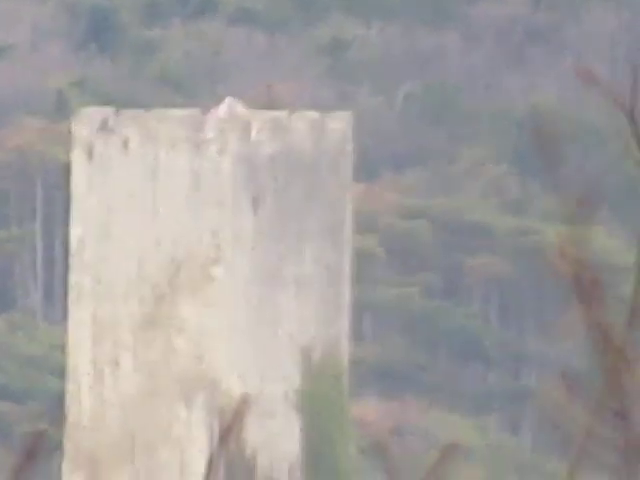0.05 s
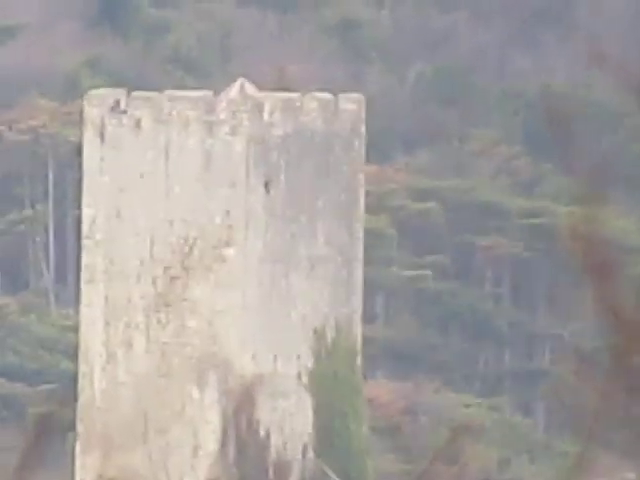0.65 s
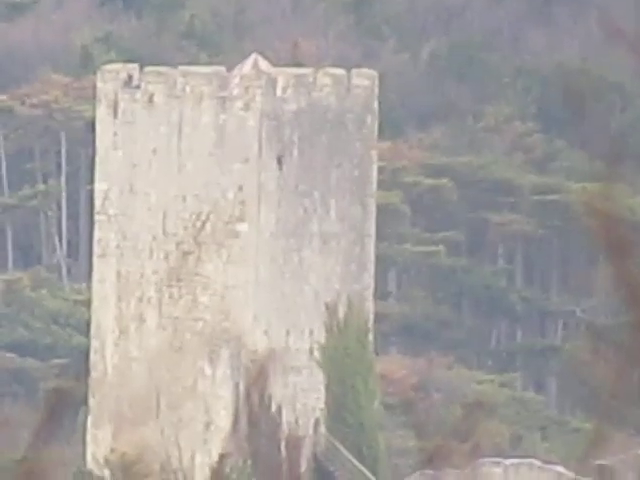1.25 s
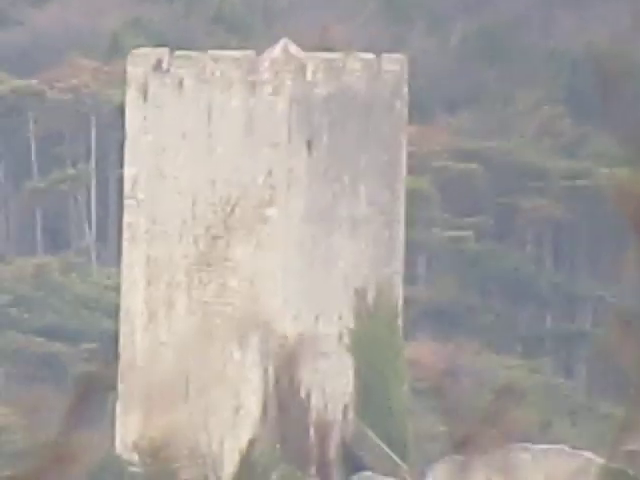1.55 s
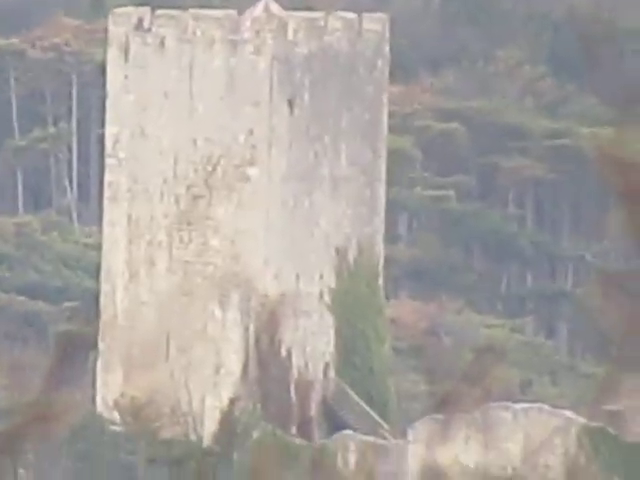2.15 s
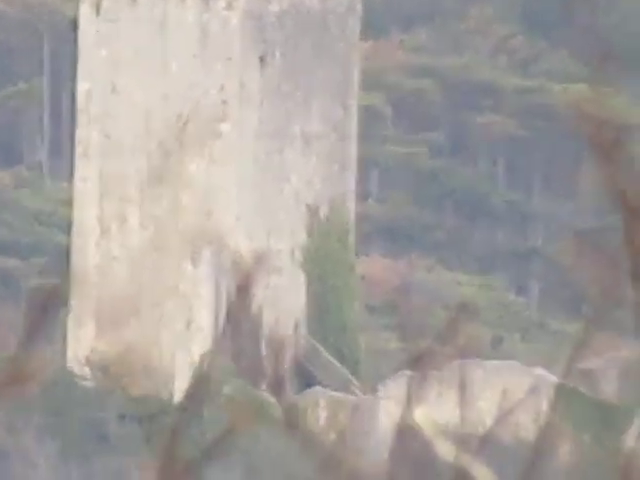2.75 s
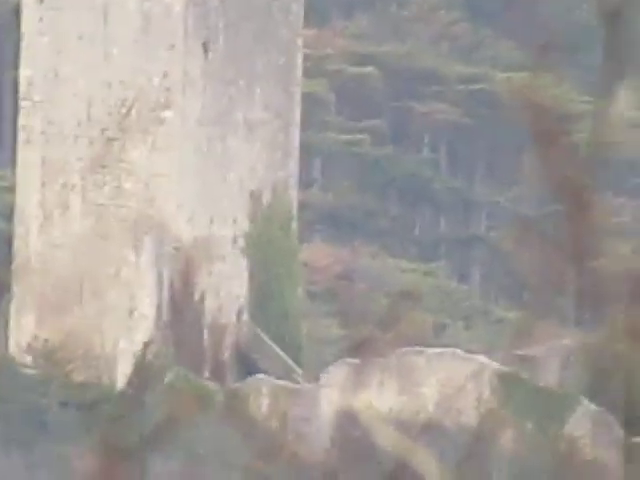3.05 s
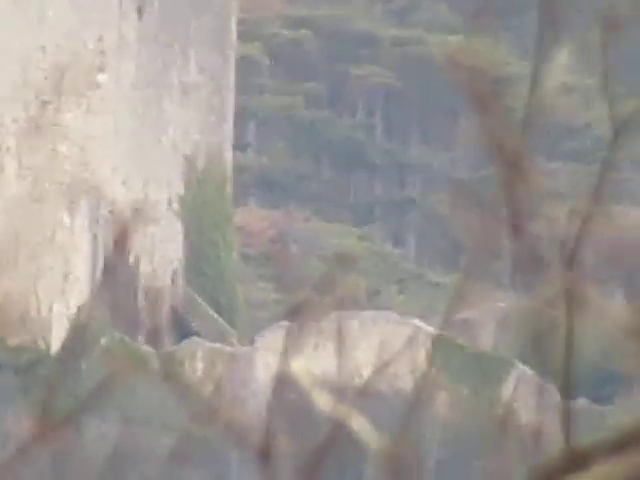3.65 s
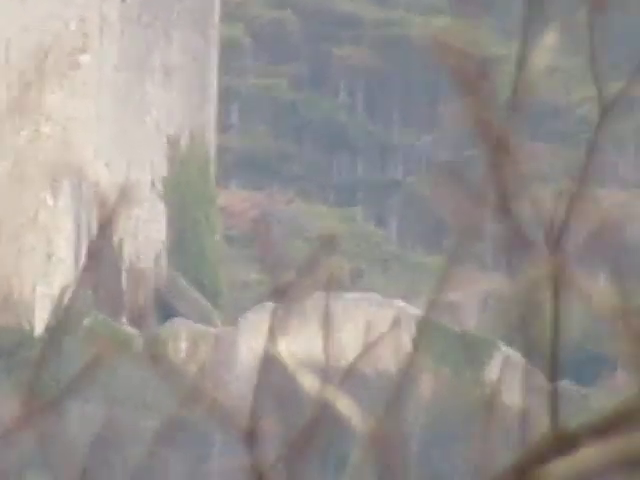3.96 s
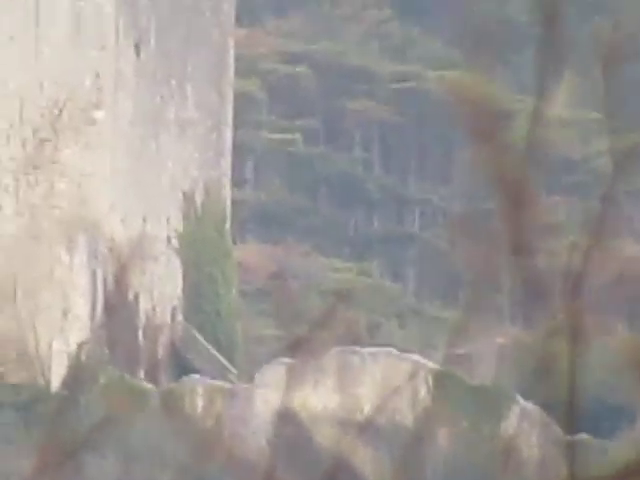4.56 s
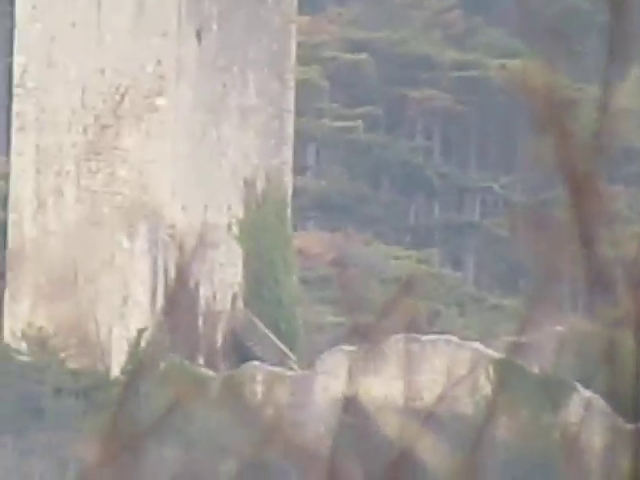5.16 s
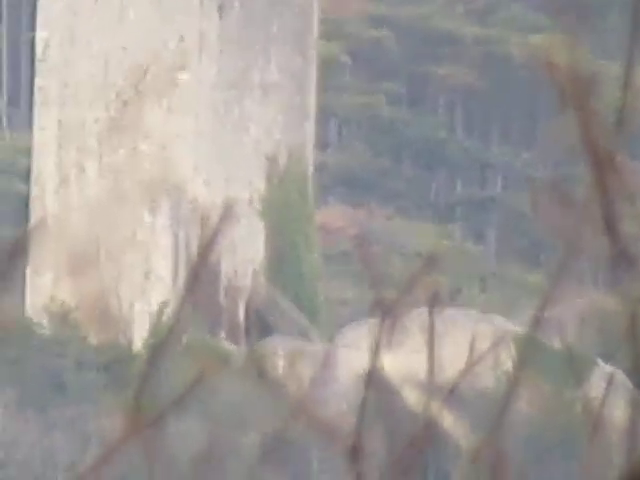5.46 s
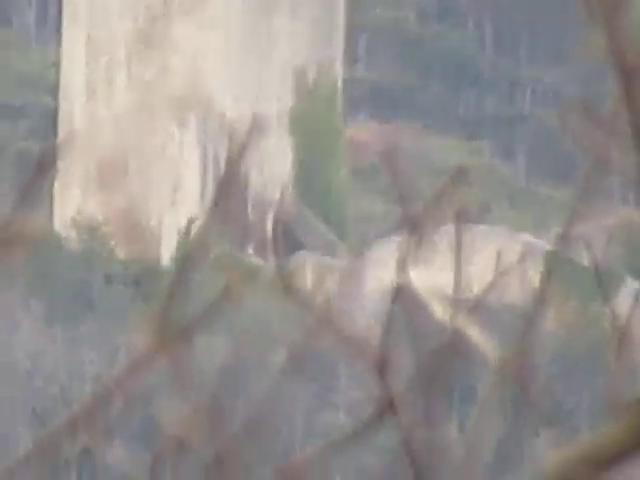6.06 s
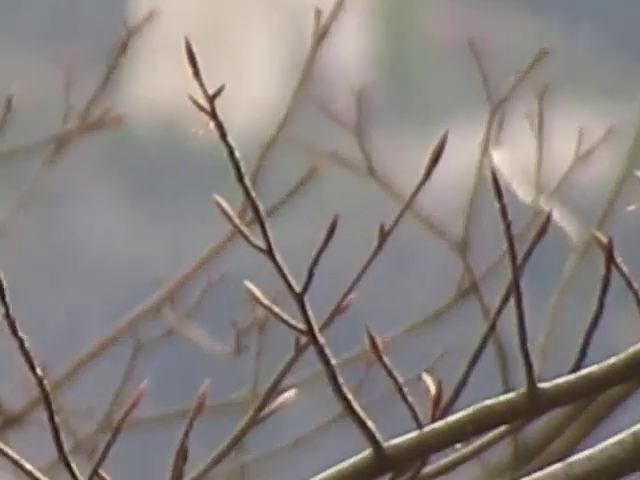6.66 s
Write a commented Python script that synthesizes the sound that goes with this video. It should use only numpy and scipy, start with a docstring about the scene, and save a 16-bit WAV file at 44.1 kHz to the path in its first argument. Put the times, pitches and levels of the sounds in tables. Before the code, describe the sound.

Distant traffic makes a low, steady rumble under a faint hiss of open air. Small birds scatter short, high chirps and a few nasal calls that echo lightly among trees. Two sharp clicks from a handled camera sound very close, about three seconds apart, the second led by small plastic ticks and finger rubs as the traffic swells. A bright tweet and a drawn-out nasal note come near the end.

```python
"""A hillside of bare trees above a valley. Small birds whistle quick rising chips and give a few
nasal, drawn-out notes, rich in harmonics; the wood scatters them into a soft echo. Close to the
microphone a handled camera creaks by stick-slip friction and lets go in two sharp clicks.
Distant traffic rumbles in the valley, with one main swell, over a low murmur and a faint hiss."""
import sys
import numpy as np
from scipy import signal
from scipy.fft import rfft, irfft, next_fast_len
from scipy.io import wavfile
from scipy.ndimage import uniform_filter1d

SR = 44100
rng = np.random.default_rng(int(sys.argv[2]) if len(sys.argv) > 2 else 0)


def master(y):
    """Save y as 16-bit WAV."""
    cut = np.clip(np.atleast_2d(y).T, -1, 1)
    pcm = np.round(cut * 32767)  # scale
    wavfile.write(sys.argv[1], SR, pcm.astype(np.int16))


N = 305172


def whistled_calls(arch_power=2.1, tweet_s=.024, tweet_hz_per_s=25000, flick_s=.015, flick_ratio=.63):
    """Frequency sweeps: chips climb and level off, slurs glide straight, tweets flick up and rise on."""
    # (start [s], length [s], first pitch [Hz], top pitch [Hz], peak level [dB])
    chips = [ (.407, .020, 4100, 4280, -59), (.566, .022, 5500, 5680, -57), (.584, .021, 2400, 3850, -47),
             (.670, .024, 3050, 4500, -43.5), (1.065, .028, 2650, 3340, -47.5),
             (1.752, .028, 2500, 3130, -58), (1.81, .026, 2750, 3060, -57), (1.837, .022, 2750, 4230, -45),
             (1.967, .03, 2350, 3880, -51.5), (2.072, .021, 3100, 4150, -52),
             (2.839, .026, 2600, 2940, -50), (3.533, .019, 2690, 3350, -55.5),
             (3.610, .060, 2780, 3000, -61), (4.737, .028, 2450, 4520, -44.5),
             (5.409, .026, 2400, 3520, -41)]
    # two slurs at once are one bird's two voices
    # (start [s], length [s], first pitch [Hz], last pitch [Hz], peak level [dB])
    slurs = [ (.486, .029, 5100, 6330, -51), (.491, .027, 6420, 6200, -50), (.596, .023, 3430, 3680, -52),
             (1.514, .015, 4330, 2100, -43.5), (1.518, .018, 4800, 2800, -49),
             (1.543, .019, 2150, 3100, -48), (2.930, .013, 3380, 3290, -53), (2.930, .020, 6820, 6380, -60),
             (4.867, .030, 2550, 4000, -41.5), (4.994, .023, 3300, 4530, -39),
             (4.994, .022, 3900, 5120, -40.5), (5.519, .016, 6330, 5830, -50),
             (5.786, .036, 5950, 6260, -58), (6.03, .032, 8080, 7420, -57), (6.059, .024, 6700, 7380, -52),
             (6.074, .031, 3420, 4520, -36), (6.091, .036, 2480, 3220, -42)]
    # the bright whistle after each flick: (start [s], first pitch [Hz], peak level [dB])
    tweets = [(1.1995, 4620, -32.8), (2.988, 5380, -55), (5.525, 4650, -31.5)]
    out = np.zeros(N)
    for start, length, first_hz, top_hz, db in chips:
        arch_hz = top_hz - (top_hz - first_hz) * (1 - progress(length)) ** arch_power
        add(out, start, whistle(arch_hz, db, crest=.45))
    for start, length, first_hz, last_hz, db in slurs:
        add(out, start, whistle(first_hz + (last_hz - first_hz) * progress(length), db))
    for start, hz, db in tweets:
        flick_hz = hz * (flick_ratio + (1 - flick_ratio) * progress(flick_s))
        add(out, start - flick_s, whistle(flick_hz, db - 15.5))
        add(out, start, whistle(hz + tweet_hz_per_s * tweet_s * progress(tweet_s), db))
    return out


def whistle(hz, db, crest=.5, overtone_db=-35):
    """A near-pure tone swells and dies; random frequency modulation makes a steep fall harsh."""
    octaves_fallen = max(np.log2(hz[0] / hz[-1]), 0)
    waver = (.0068 + .04 * octaves_fallen) * narrow_noise(0, 300, len(hz))
    phase = phase_of(hz * (1 + waver))
    swell = np.sin(np.pi * np.interp(np.linspace(0, 1, len(hz)), [0, crest, 1], [0, .5, 1]))
    return from_db(db) * swell * (np.sin(phase) + from_db(overtone_db) * np.sin(2 * phase))


def nasal_notes(swell_db=13, dulling_db_per_octave=70, plateau=.7, release_s=.012):
    """Spectral tilt sets timbre: each short note grows louder and purer as its pitch rises."""
    # (start [s], length [s], first pitch [Hz], last pitch [Hz], full level [dB], first tilt [dB/octave])
    notes = [(1.355, .083, 1335, 1830, -42.5, 10), (1.474, .044, 1900, 2200, -41, -7),
             (5.812, .062, 1430, 1800, -45.5, 21)]
    out = np.zeros(N)
    for start, length, first_hz, last_hz, db, first_tilt_db in notes:
        u = progress(length)
        tilt_db = first_tilt_db - dulling_db_per_octave * u ** 2.2
        climb = u + plateau * np.sin(2 * np.pi * u) / (2 * np.pi)   # slowest in mid-note
        hz = first_hz + (last_hz - first_hz) * climb
        voice = nasal_voice(hz, db - swell_db * (1 - u) ** 2, tilt_db, rasp=.05)
        add(out, start, voice * np.minimum(1, (1 - u) * length / release_s))
    return out


def long_call(start_s=5.904, length_s=.18, held_hz=1652, db=-42.5, attack_s=.026, release_s=.016):
    """Pitch and tilt move together: a nasal call scoops down, holds brightly, rasps, falters and lifts."""
    out = np.zeros(N)
    t = length_s * progress(length_s)
    scoop = np.clip(1 - t / .04, 0, 1)
    lift = np.clip(1 - (length_s - t) / .024, 0, 1)
    falter = bell(start_s + t, centre_s=6.031, half_width_s=.012)
    rasp = .19 + .68 * bell(start_s + t, centre_s=5.976, half_width_s=.017)
    hz = held_hz + 150 * scoop + 38 * falter + 240 * lift
    tilt_db = 3 - 9 * scoop - 14 * lift
    envelope = np.minimum(1, np.minimum(t / attack_s, (length_s - t) / release_s))
    add(out, start_s, envelope * nasal_voice(hz, db - 6 * falter, tilt_db, rasp))
    return out


def nasal_voice(hz, db, tilt_db, rasp, trill_hz=300, pitch_depth=.049, level_depth=.58, flutter_db=2):
    """Source and filter: the throat favours harmonics 2 and 3; fast, uneven modulation adds the rasp."""
    # harmonics 1 to 4 before tilting: (relative level [dB])
    harmonics_db = [-17, -1, -3, -13.5]
    n = len(hz)
    trill = rasp * np.sin(phase_of(trill_hz * (1 + .3 * narrow_noise(0, 150, n))))
    waver = .0039 * narrow_noise(0, 250, n)
    phase = phase_of(hz * (1 + waver + pitch_depth * trill))
    voice = sum(from_db(harmonic_db + tilt_db * np.log2(max(k, 2) / 2)) * np.sin(k * phase)
                for k, harmonic_db in enumerate(harmonics_db, 1))
    voice /= np.sqrt(2 * uniform_filter1d(voice ** 2, size=200))   # level independent of tilt
    gain = from_db(db + flutter_db * narrow_noise(0, 160, n))
    return voice * (1 + level_depth * trill) * gain * signal.windows.tukey(n, .1)


def far_notes(width_hz=170):
    """Spectral broadening: distance smears thin, high whistles into narrow bands."""
    # (start [s], length [s], pitch [Hz], rms level at the crest [dB])
    notes = [(1.85, .09, 6100, -64), (2.14, .06, 7600, -67), (4.049, 0.16, 7500, -58),
             (4.39, .05, 7650, -64)]
    out = np.zeros(N)
    for start, length, hz, db in notes:
        n = int(length * SR)
        add(out, start, from_db(db) * np.sqrt(np.hanning(n)) * narrow_noise(hz, width_hz, n))
    return out


def wood_echo(x, t60_s=.41, first_echo_s=.0086, near_db=5, near_decay_s=.011):
    """Scattering: near branches return the sound at once, farther trunks leave a reverberant tail."""
    t = np.arange(SR // 2) / SR
    decay = from_db(-60 * t / t60_s) + from_db(near_db) * np.exp(-t / near_decay_s)
    echoes = rng.standard_normal(len(t)) * decay * (t > first_echo_s)
    return signal.fftconvolve(x, echoes / np.linalg.norm(echoes))[:N]


def camera():
    """Stick-slip: gripped plastic ticks and creaks, then lets go in a snap that rings the shell."""
    # (time [s], level [dB], tilt [dB/octave])
    ticks = [ (1.552, -45, -4), (1.5625, -29.5, -2), (1.5677, -17, 6), (3.8355, -43, -4),
             (4.1314, -31.5, -3.2), (4.2085, -38, -2), (4.2726, -34.5, -5.5), (4.328, -31.5, -2.5),
             (4.335, -30, -2.5), (4.345, -44.5, -2), (4.783, -33, -5), (4.7896, -30, -3), (4.7915, -35, -3),
             (4.7955, -34, -1)]
    # (time [s], level [dB], decay [s], tilt [dB/octave], tilt of creak and ring [dB/octave])
    snaps = [(1.5688, -5.6, .00025, 1.8, -3.6), (4.8009, -6.8, .00062, 4.8, -1.2)]
    # around each snap: (lead [s], level against the snap [dB], build-up [s], decay [s])
    creak = (.003, -25.2, .0026, .0018)
    ring = (0, -14.4, .0009, .0015)
    out = np.zeros(N)
    for at, db, tilt_db in ticks:
        add(out, *contact(at, db, tilt_db, build_s=.0003, decay_s=.001))
    for at, db, decay_s, tilt_db, body_tilt_db in snaps:
        add(out, *contact(at, db, tilt_db, build_s=.00018, decay_s=decay_s))
        add(out, at, knock())
        for lead_s, part_db, *build_and_decay in (creak, ring):
            add(out, *contact(at - lead_s, db + part_db, body_tilt_db, *build_and_decay))
    return out


def contact(at, db, tilt_db, build_s, decay_s):
    """Tiny slips excite the shell's resonances; gives (start, sound), with db roughly the level at the burst's
    peak."""
    # the shell's response: (frequency [Hz], relative level [dB])
    shell = [(300, -21), (900, -8.5), (1900, -2), (2400, -6.5), (3200, -1.5), (4000, -12), (5500, 2),
             (6600, -0.5), (8200, 4), (9600, 1), (10700, -6.5), (11600, 7), (12900, -5.5), (14600, 1)]
    t = np.arange(-SR // 50, SR // 50) / SR
    envelope = np.exp(-np.abs(t) / np.where(t < 0, build_s, decay_s))
    slip_spectrum = rfft(rng.choice([-1, 1], len(t)) * envelope)
    local_power = uniform_filter1d(np.abs(slip_spectrum) ** 2, size=50)
    crackle = irfft(slip_spectrum / np.sqrt(local_power), len(t))   # energy even over frequency
    return at + t[0], from_db(db) * coloured(crackle, shell, tilt_db) * np.sqrt(np.mean(envelope ** 2))


def knock(hz=490, db=-25, decay_s=.0013):
    """A heavily damped oscillator: the camera's body gives one short swing."""
    t = np.arange(SR // 50) / SR
    return from_db(db) * np.sin(2 * np.pi * hz * t) * np.exp(-t / decay_s)


def finger_rubs():
    """Sliding friction: skin on the camera's plastic gives brief, broadband noise."""
    # (start [s], length [s], rms level at the crest [dB])
    rubs = [(3.868, 0.1, -54.7), (4.001, .03, -58), (4.272, 0.083, -53.3), (4.788, .045, -51),
            (4.837, .02, -58)]
    # (frequency [Hz], relative spectral density [dB])
    friction = [(1000, -6), (2200, -2), (3500, -5), (5600, 2), (7500, -2), (9200, 0), (10600, -5),
                (11800, 1), (14800, -4)]
    out = np.zeros(N)
    for start, length, db in rubs:
        n = int(length * SR)
        add(out, start, from_db(db) * np.sqrt(np.hanning(n)) * coloured(rng.standard_normal(n), friction))
    return out


def traffic():
    """Incoherent sources add in power: far engines and tyres swell as vehicles come and go."""
    # dulled by distance: (frequency [Hz], relative spectral density [dB])
    rumble = [(45, -30), (64, -16.5), (88, -2), (115, -2), (155, -1), (180, -9), (205, -25), (300, -63)]
    drone = [(165, -37), (197, -7), (220, -1.5), (250, -0.5), (292, -2), (312, -16.5), (350, -25)]
    tyres = [(300, -18), (330, -5), (365, 1.5), (420, 3), (455, -5.5), (510, -0.5), (570, -12), (620, -7),
             (800, -21.5), (1500, -30)]
    # (frequency [Hz], half-width [Hz], level against the drone [dB])
    engine_tones = [(286.7, 6.4, -7)]
    # the steady flow: (rumble [dB], drone [dB], tyres [dB])
    steady_db = (-50.6, -54.8, -56.4)
    # (crest time [s], half-width [s], rumble [dB], drone [dB], tyres [dB])
    swells = [ (.02, .14, -62, -62, -52), (.6, .26, -45, -52.5, -64), (1.38, .18, -53, -51.5, -57),
              (3.3, .5, -44.5, -55.5, -59.5), (3.82, .22, -57, -41.5, -58), (4.15, .25, -48.5, -47, -48.8),
              (4.65, .25, -47.5, -52, -70), (5.52, .26, -45, -54.5, -80)]
    t = np.arange(N) / SR
    power = from_db(steady_db)[:, None] ** 2
    for at, half_width, *levels_db in swells:
        power = power + from_db(levels_db)[:, None] ** 2 * bell(t, at, half_width)
    rumble_gain, drone_gain, tyre_gain = np.sqrt(power)
    tones = sum(from_db(db) * narrow_noise(hz, width, next_fast_len(N))[:N]
                for hz, width, db in engine_tones)
    return rumble_gain * noise(rumble) + drone_gain * (noise(drone) + tones) + tyre_gain * noise(tyres)


def engine_hum(wander_hz=2.6):
    """Periodic firing gives one far engine a low note, which drifts in and out on the air."""
    # (crest time [s], half-width [s], frequency [Hz], peak level [dB])
    swells = [(2.56, .16, 112.2, -41.5), (3.45, .35, 116.8, -45), (5.68, .3, 113, -52)]
    t = np.arange(N) / SR
    wander = phase_of(wander_hz * narrow_noise(0, 8.2, next_fast_len(N))[:N])
    return sum(from_db(db) * bell(t, at, half_width) * np.sin(2 * np.pi * hz * t + wander)
               for at, half_width, hz, db in swells)


def valley_air(murmur_db=-52, hiss_db=-58):
    """Stationary noise: the valley's low murmur of wind and distance, with a faint hiss above it."""
    # (frequency [Hz], relative spectral density [dB])
    murmur = [(12, -16), (25, 9), (42, 10.5), (62, 8.5), (150, 0), (560, 0), (700, -2.5), (950, -4.5),
              (1200, -8.5), (1600, -17.5), (3000, -27)]
    hiss = [(650, -30), (1100, -7.5), (1280, -4), (1600, -2.5), (1860, -3.5), (2700, -4), (3430, -7),
            (7870, -8), (13700, -15), (15000, -20)]
    return from_db(murmur_db) * noise(murmur) + from_db(hiss_db) * noise(hiss)


def noise(spectrum):
    """Filtered white noise of one steady colour; rms 1."""
    return coloured(rng.standard_normal(next_fast_len(N)), spectrum)[:N]


def narrow_noise(hz, width_hz, size):
    """Narrowband noise: a tone that wavers in amplitude and phase, or a random drift at 0 Hz; rms 1."""
    detuning = (np.fft.rfftfreq(size, 1 / SR) - hz) / width_hz
    return rms_one(irfft(rfft(rng.standard_normal(size)) / (1 + detuning ** 2), size))


def coloured(x, spectrum, tilt_db=0):
    """Linear filtering by a (frequency [Hz], level [dB]) curve, tilted by tilt_db per octave; rms 1."""
    hz, db = np.transpose(spectrum)
    octave = np.log2(np.fft.rfftfreq(len(x), 1 / SR) + 1)
    inside = np.clip(octave, np.log2(hz[0]), np.log2(hz[-1]))
    skirts_db = -24 * np.abs(octave - inside)
    gain = from_db(np.interp(octave, np.log2(hz), db) + tilt_db * inside + skirts_db)
    return rms_one(irfft(rfft(x) * gain, len(x)))


def phase_of(hz):
    """Phase in radians is the integral of angular frequency."""
    return 2 * np.pi * np.cumsum(hz) / SR


def bell(t, centre_s, half_width_s):
    """A Gaussian rise and fall of height 1."""
    return np.exp(-.5 * ((t - centre_s) / half_width_s) ** 2)


def progress(length_s):
    """Normalised time, from 0 to 1 over a note."""
    return np.linspace(0, 1, int(length_s * SR))


def from_db(db):
    """Decibels to amplitude ratio."""
    return 10 ** (np.asarray(db) / 20)


def rms_one(x):
    """Normalisation to unit rms."""
    return x / np.sqrt(np.mean(x ** 2) + 1e-20)


def add(out, start_s, sound):
    """Superposition of a sound from a given time on."""
    i = max(round(start_s * SR), 0)
    out[i:i + len(sound)] += sound[:max(len(out) - i, 0)]


def scene(echo_db=-11.5):
    """Superposition in one channel: birds and their echo, the camera close by, the valley behind."""
    birds = whistled_calls() + nasal_notes() + long_call() + far_notes()
    background = traffic() + engine_hum() + valley_air()
    return (birds + from_db(echo_db) * wood_echo(birds) + camera() + finger_rubs() + background)[None]


def record(dry, ceiling=.6, cutoff_hz=15250):
    """Soft saturation rounds the sharpest peaks; a steep low-pass filter cuts the top."""
    rounded = ceiling * np.tanh(dry / ceiling)
    return signal.fftconvolve(rounded, signal.firwin(301, cutoff_hz, fs=SR)[None], mode="same")


dry = scene()
out = record(dry)
master(out)
```